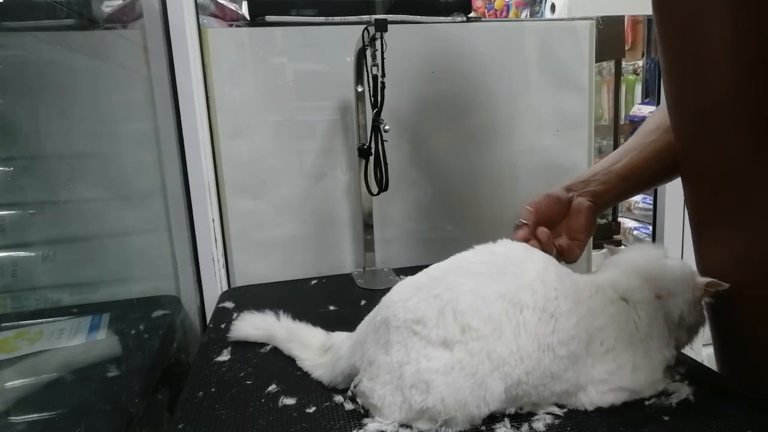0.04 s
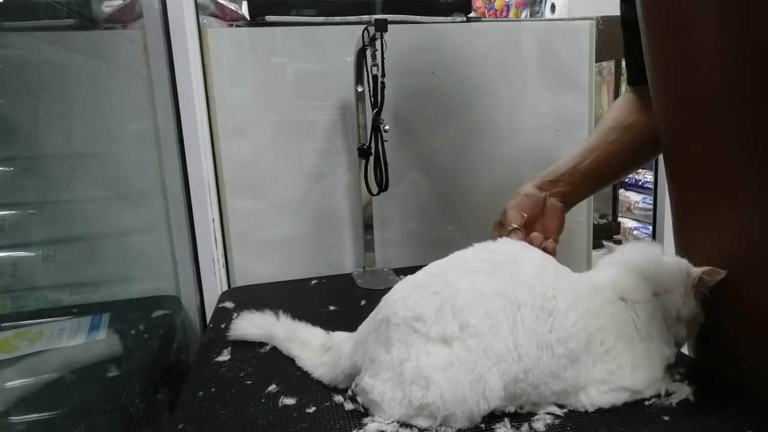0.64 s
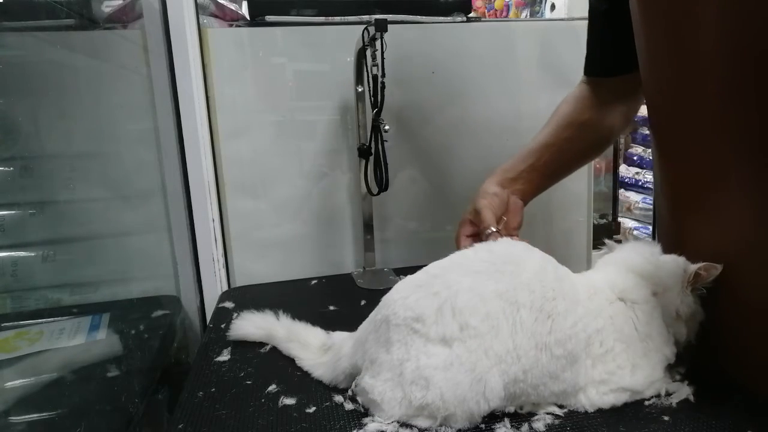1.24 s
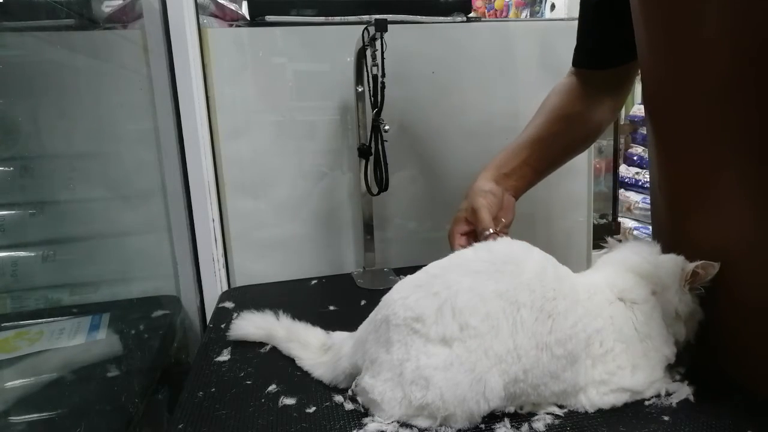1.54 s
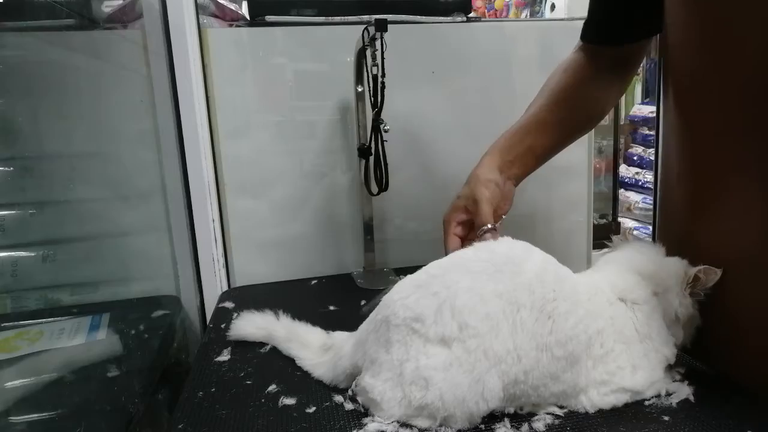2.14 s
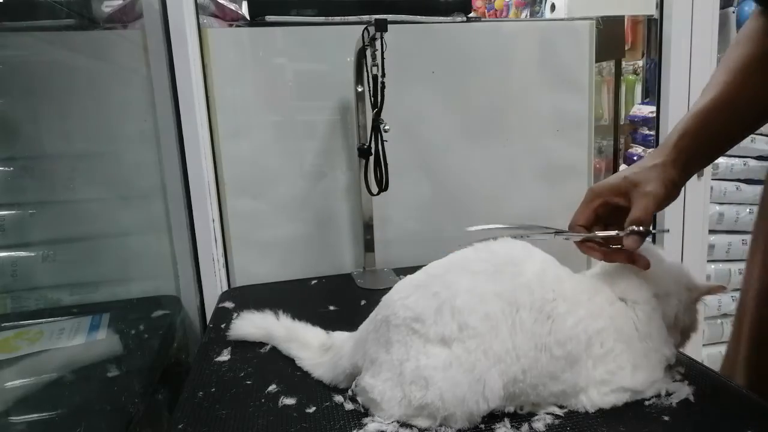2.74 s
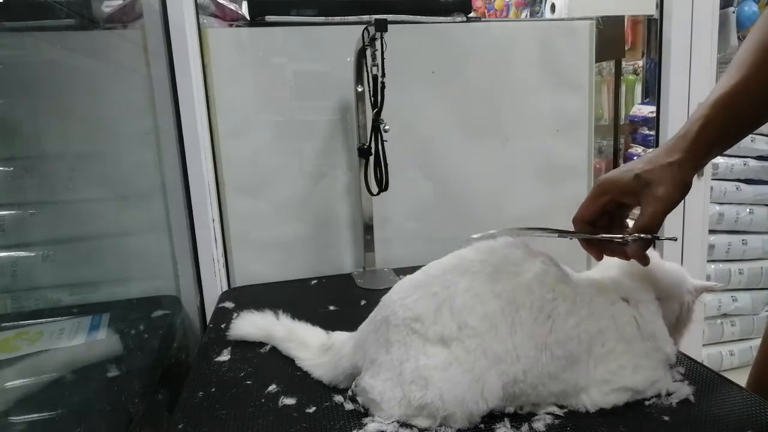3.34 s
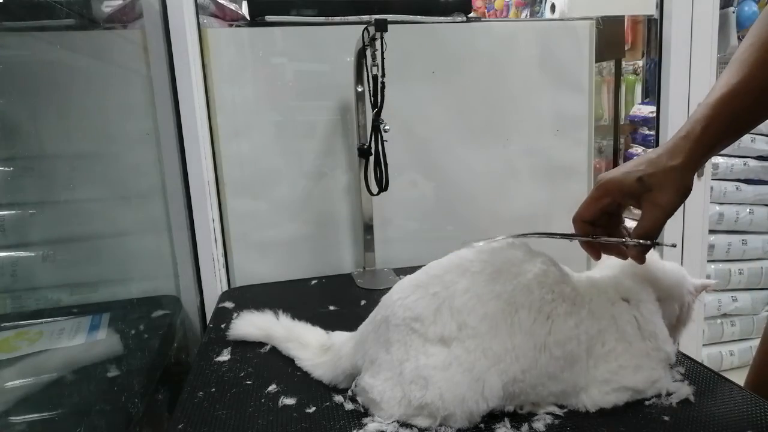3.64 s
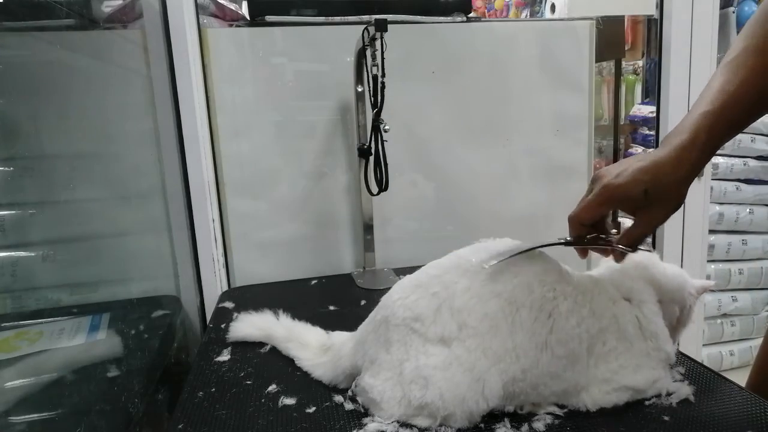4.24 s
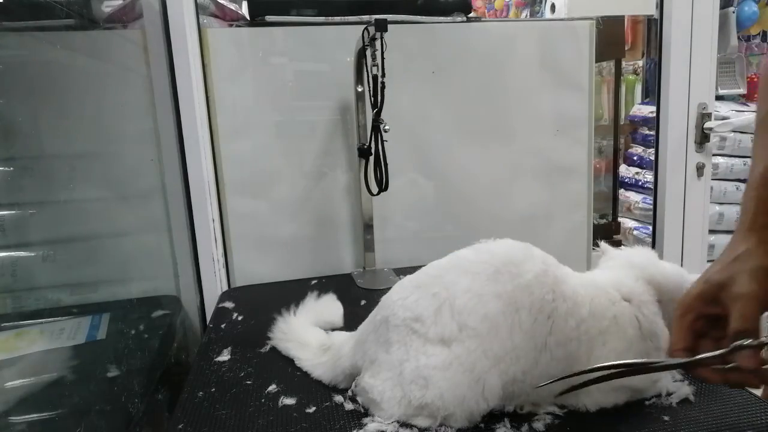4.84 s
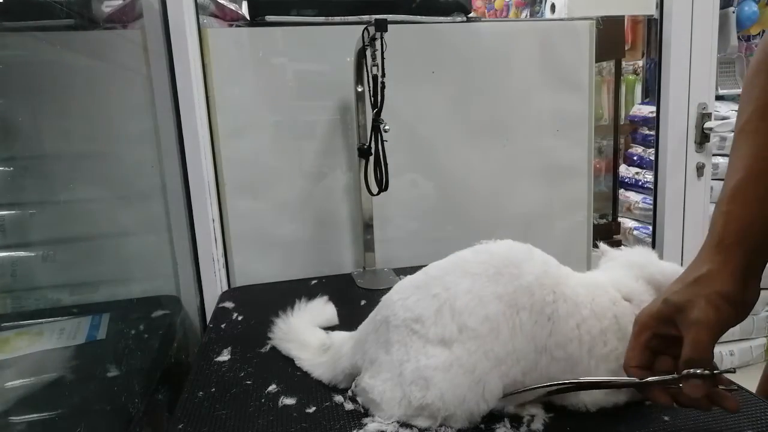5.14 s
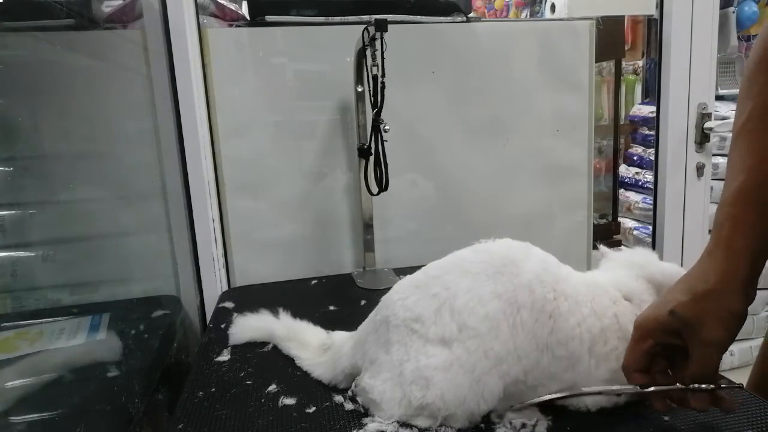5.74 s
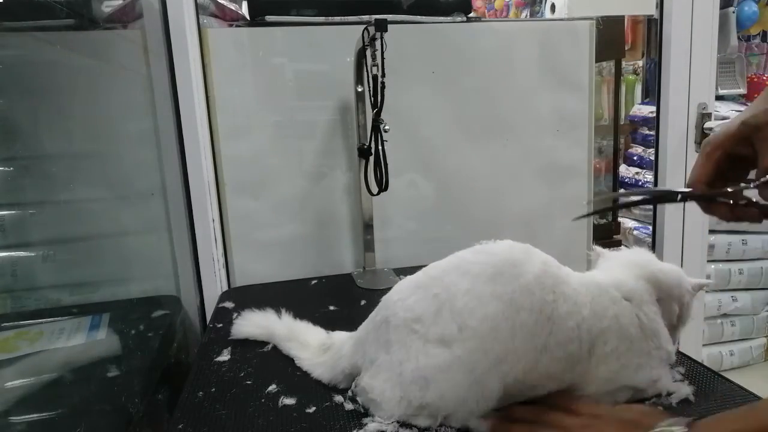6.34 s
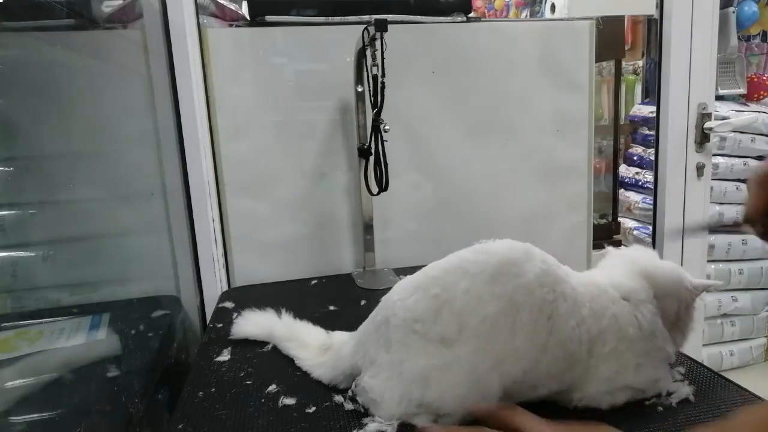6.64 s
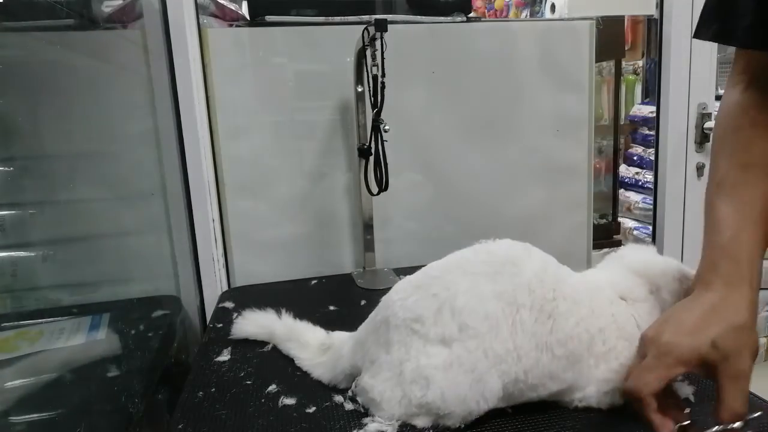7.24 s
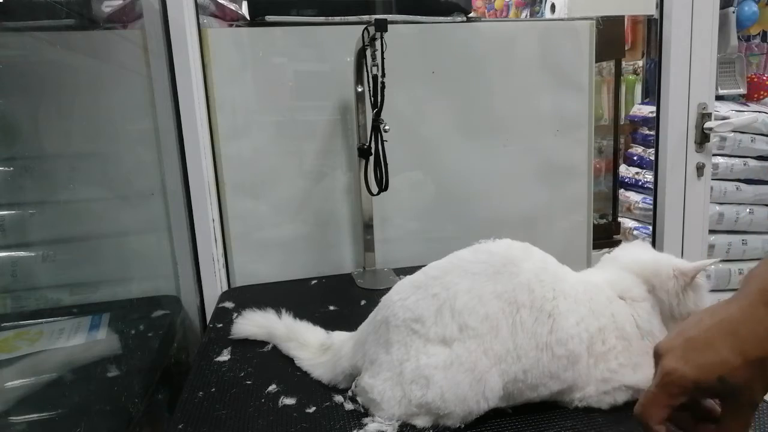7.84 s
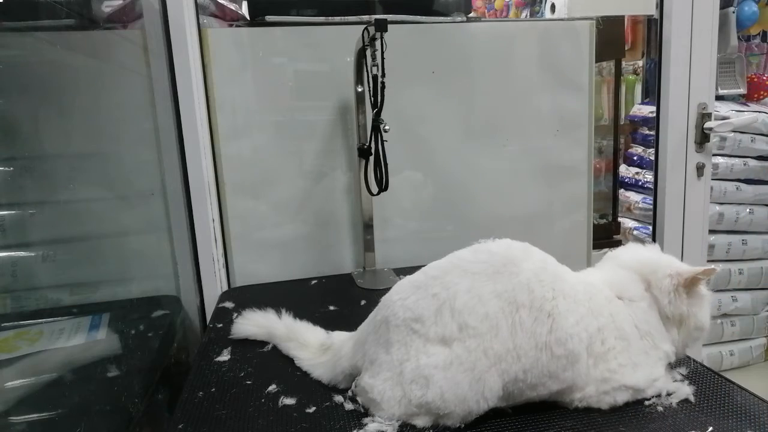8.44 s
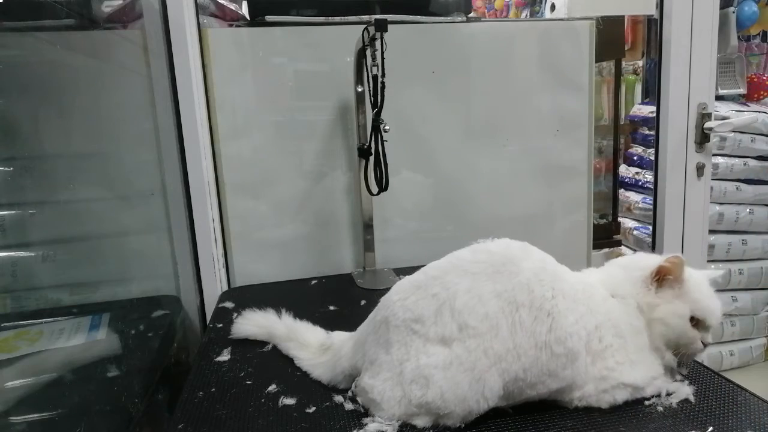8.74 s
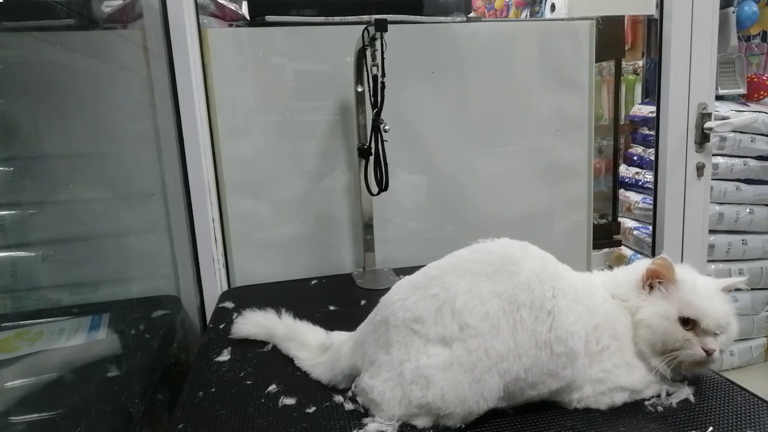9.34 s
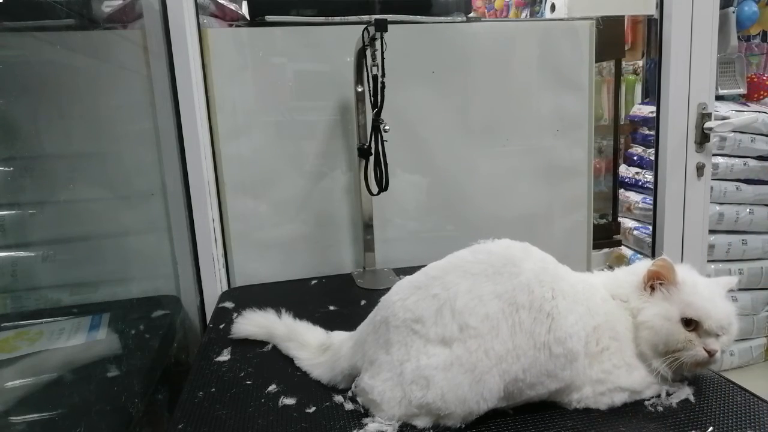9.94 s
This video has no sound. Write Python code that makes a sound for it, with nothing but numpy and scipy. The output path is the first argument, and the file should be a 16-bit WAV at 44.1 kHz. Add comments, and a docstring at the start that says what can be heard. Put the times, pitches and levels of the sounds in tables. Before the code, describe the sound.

In a small grooming shop with a low, steady ventilation hum, nearby scissors cut fur in a quick, even run of thin, bright metallic snips. Around halfway the cutting thins out to scattered snips and clicks. Handling noises take over a little further off: hands rubbing over a mat, small ticks, a low dragging rumble and several louder knocks that make the tabletop ring briefly.

```python
"""Scissors at a grooming table

Long curved scissors trim a cat's fur in a small, hard-walled shop. About three times a second the
edges grind open and shut, stick-slip friction exciting the blades' modes; at times they clack on
their stop. Then hands brush the mat, and things slid and knocked about set the table ringing.
Ventilation hums throughout."""
import sys
import numpy as np
from scipy import signal
from scipy.fft import rfft, irfft, next_fast_len
from scipy.io import wavfile
from scipy.ndimage import uniform_filter1d

SR = 44100
rng = np.random.default_rng(int(sys.argv[2]) if len(sys.argv) > 2 else 0)


def wav_record(signal):
    """Record a signal, one row per channel, as 16-bit PCM in the file named by sys.argv[1]."""
    frames = np.transpose(np.atleast_2d(signal))
    bounded = np.clip(frames, -1, 1)
    # unit amplitude maps onto the largest positive 16-bit level
    quanta = np.round(bounded * 32767).astype(np.int16)
    wavfile.write(sys.argv[1], SR, quanta)


N = 440559
T = np.arange(N) / SR
FFT_SIZE = next_fast_len(N + SR)
FREQ = np.maximum(np.fft.rfftfreq(FFT_SIZE, 1 / SR), 1)

# Scissor cuts: open_s, open_db, shut_s, shut_db, shut_length_s, rasp_db
SNIPS = [(.014, -47.5, .204, -41.5, 0.032, -2), (.362, -49.5, .524, -40, 0.024, -3),
         (0.668, -49, .817, -42.5, 0.021, -23), (.992, -52, 1.126, -39, 0.012, -2),
         (1.283, -47, 1.415, -39, 0.023, 6), (1.549, -51.5, 1.699, -60, 0.024, -4),
         (1.833, -54.5, 1.99, -39.5, 0.017, -2), (2.127, -49.5, 2.265, -42, .022, -15),
         (2.335, -45, 2.493, -42, 0.027, -11), (2.986, -48.5, 3.12, -36, 0.013, -5),
         (3.28, -47.5, 3.415, -40.5, 0.026, -1), (3.597, -49, 3.729, -36.5, 0.012, 3),
         (3.876, -48.5, 4.017, -40, 0.021, -1), (4.157, -47, 4.309, -39.5, 0.019, -1),
         (4.408, -46.5, 4.566, -41.5, .018, -4), (5.425, -61, 5.514, -49.5, 0.026, -5),
         (5.632, -64, 5.81, -36, 0.0134, -1), (5.896, -48.5, 6.107, -41.5, .028, -6),
         (7.52, -50.5, 7.835, -41.5, 0.021, -13)]
# Modes of the blades: pitch_hz, width_hz, rubbed_db, struck_db
BLADE_MODES = [(4780, 500, -10, -45), (5170, 150, -12, -16), (6350, 410, -11.5, -14.5),
               (7150, 107, 3.5, -18.5), (7730, 62, 3, -9.5), (8210, 64, 2.5, -6), (9090, 57, 1, -38),
               (9620, 79, -5.5, -32), (9390, 50, -21, -4.5), (10090, 45, 4.5, 1), (11230, 130, -6, -10.5),
               (13300, 390, -30, -23), (14000, 260, -13, -13), (14600, 360, -2.5, -15)]
# Steel striking steel: start_s, level_db
CLACKS = [(.072, -35.5), (0.712, -41.5), (.995, -48.5), (1.88, -34.5), (3.13, -50), (3.279, -44.5),
          (3.596, -43), (4.432, -44.5), (5.639, -35.5), (7.4108, -30.5), (7.418, -38), (7.8046, -31)]
# Things knocked on the table: start_s, body_db, body_hz, body_width_hz, crack_db, contact_s
KNOCKS = [(.233, -43.5, 675, 450, -51, 0.0087), (5.94, -45.5, 780, 694, -52.5, 0.065),
          (6.404, -69, 900, 700, -38, 0.027), (6.845, -48, 317, 350, -37, 0.0098),
          (7.31, -42.5, 600, 700, -58, .031), (7.355, -43.5, 760, 700, -57, 0.02),
          (7.799, -49.5, 593, 700, -42.5, 0.0094), (8.013, -35, 666, 228, -36, 0.0051),
          (9.048, -32.5, 600, 680, -46, 0.014), (9.551, -32.5, 783, 263, -38, 0.024),
          (9.738, -30.5, 475, 170, -40.5, 0.0099), (9.747, -26.5, 980, 305, -41, .011),
          (9.789, -36, 227, 179, -47, 0.02)]
# Modes of the table top: pitch_hz, width_hz, level_db
TABLE_MODES = [(225, 10, -20), (390, 22, -5.5), (444, 18, -2.5), (478, 23, -6), (640, 53, -6),
               (705, 13, -19), (780, 30, -6), (820, 4.8, -5), (860, 6.8, -8), (1024, 15, -10),
               (1093, 16, -17), (1220, 6.7, -20), (1310, 12, -23), (1750, 150, -8), (2380, 32, -8),
               (3010, 190, -2.5)]
# Hands and things passing over the mat: start_s, length_s, scrape_db, hiss_db
RUBS = [(4.854, 0.42, -61.5, -67.5), (6.065, 0.5, -56, -52.5), (6.412, 0.33, -46, -46),
        (6.803, 0.16, -50, -52), (6.845, 0.58, -62, -61), (7.269, 0.056, -47.5, -46.5),
        (7.319, 0.063, -41, -38.5), (7.495, 0.13, -63, -53.5), (7.616, 0.4, -61, -56),
        (8.0, 0.37, -66.5, -66.5), (8.236, 0.29, -65, -54.5), (8.55, 0.068, -56.5, -46.5),
        (8.613, .13, -43.5, -46), (8.746, 0.41, -41, -43), (9.17, 0.086, -63, -43.5),
        (9.237, 0.24, -59.5, -47), (9.442, 0.15, -49.5, -44)]
# Pushes that shake the table: start_s, length_s, level_db
DRAGS = [(4.51, 0.98, -51.5), (6.798, 0.071, -43), (7.284, 0.072, -45), (8.619, 0.32, -39),
         (8.715, .54, -38), (9.069, .085, -32.5), (9.385, .24, -47.5)]
# Soft swishes: start_s, length_s, level_db, centre_hz, width_hz
SWISHES = [(0.497, 0.88, -67.5, 2800, 700), (1.03, 0.24, -48, 5560, 2100), (1.166, 0.23, -52.5, 2980, 840),
           (1.3, .32, -59.5, 2670, 760)]
# Dry ticks of handling: start_s, level_db
TICKS = [(6.775, -53), (6.8, -53.5), (6.848, -40), (8.429, -48), (8.644, -43), (9.39, -45.5), (9.894, -60)]
# Short creaks: start_s, level_db, centre_hz, width_hz, contact_s
CREAKS = [(0.508, -56, 2730, 220, 0.013), (9.894, -44.5, 2380, 430, 0.0056)]
# Spectral envelopes of the handling noises and of moving air: frequency_hz, level_db
SCRAPE_SPECTRUM = [(240, -7.5), (400, -11.5), (690, -1), (850, -3.5), (1050, -6), (1400, -7.5),
                   (3100, -6.5), (4200, -15), (6000, -54)]
HISS_SPECTRUM = [(2200, -36), (3300, -4.5), (3950, -8.5), (4800, -7), (5700, -2), (6300, -5), (7100, -2.5),
                 (7800, -8.5), (8600, -9), (10700, -16.5), (14700, -20), (16000, -21)]
DRAG_SPECTRUM = [(25, -30), (50, -3), (87, -14), (124, 10.5), (157, 2.5), (221, -4.5), (307, -4.5),
                 (487, -6.5), (700, -11.5), (1400, -18), (2200, -53)]
TICK_SPECTRUM = [(1500, -15), (3200, 5.5), (4000, 0), (5500, 2.5), (7000, 1.5), (10000, -10.5),
                 (15000, -15)]
AIR_SPECTRUM = [(20, -4), (35, -10), (55, -5), (114, -5), (165, -6), (240, -5.5), (300, -9), (427, -14),
                (640, -18.5), (1200, -26), (2100, -30.5), (2700, -26.5), (3900, -32.5), (5400, -30.5),
                (8000, -36), (16000, -44.5)]
# Room modes driven by the ventilation: pitch_hz, width_hz, level_db
HUM_MODES = [(100.3, 14, -0.5), (123.3, 8.4, 7), (188.3, 4.3, 4), (232.6, 29, 3)]
# Reverberation time: frequency_hz, t60_s
ROOM_T60 = [(150, 0.18), (700, 0.55), (3000, 0.39), (8000, 0.35), (15000, 0.26)]
# Likeness of diffuse sound at the two microphone ports: frequency_hz, correlation
COHERENCE = [(60, 0.83), (150, 1), (350, 0.75), (700, 0.23), (1400, 0), (16000, 0.038)]
# Level difference between the ports: frequency_hz, left_minus_right_db
PORT_BALANCE = [(60, 1), (350, 3.5), (700, -2.5), (1400, -1.5), (2500, -0.5), (4500, -2.5), (6500, -7.5),
                (8300, 10), (10000, 1.5), (12500, 0), (15000, -5)]


def snips(rows, edge_s=0.0013, detune=0.0165, scatter_db=4, cutoff_hz=4200,
          grit_db=-13.5, floor_db=-26, zing_db=-12, shut_rasp_db=-12):
    """Friction of edges and hair drives the blades' modes, which shift a little with every grip."""
    track, freq = np.zeros(N), np.maximum(np.fft.rfftfreq(8192, 1 / SR), 1)
    grind = friction(slips_per_s=7000, spread_db=-1.5, patch_db=4.5, patch_hz=500)
    grips = rng.standard_normal((2 * len(rows), len(BLADE_MODES), 2))
    pole = np.exp(-1 / (edge_s * SR))  # rounds the onset and end of the force
    radiation = (1 + (cutoff_hz / freq) ** 8) ** -0.5  # narrow blades radiate little bass
    for (start_s, pressure, opening, rasp_db), grip in zip(strokes(rows), grips):
        force = signal.lfilter([1 - pole], [1, -pole], np.pad(pressure, (0, 512)))
        slips = force * unit(grind[int(abs(start_s) * SR):][:len(force)])
        modes = [(hz * (1 + detune * shift), width, db + scatter_db * tilt)
                 for (hz, width, db, _), (shift, tilt) in zip(BLADE_MODES, grip)]
        # the flats drag together with a lower rasp, most of all while opening
        rasp = resonances([(5500, 1200, rasp_db + (0 if opening else shut_rasp_db))], freq)
        steel = (resonances(modes, freq) + undb(grit_db) + rasp) * radiation + undb(floor_db)
        add(track, start_s, irfft(rfft(slips, 8192) * unit(steel)))
        add(track, start_s, undb(zing_db) * zing(force, opening))
    return track


def strokes(rows, creep_s=0.05, grind_s=0.03, shut_fade_db=-8.5):
    """Contact pressure: opening creeps, then grinds; shutting bites and eases towards the tips."""
    creep_db = np.linspace(-23, -7, int(creep_s * SR))
    grind_db = np.linspace(0.75, -0.75, int(grind_s * SR))
    for open_s, open_db, shut_s, shut_db, length_s, rasp_db in rows:
        yield open_s - creep_s, undb(open_db + np.r_[creep_db, grind_db]), True, rasp_db
        yield shut_s, undb(shut_db + np.linspace(0, shut_fade_db, int(length_s * SR))), False, rasp_db


def zing(force, opening, shut_hz=8000, open_hz=9300, wobble_hz=420):
    """A thin friction tone follows the edges' crossing point: up on opening, down on closing."""
    sweep = (shut_hz, open_hz) if opening else ((shut_hz + open_hz) / 2, shut_hz)
    wobble = unit(uniform_filter1d(rng.standard_normal(4096), 40))[:len(force)]
    pitch_hz = np.linspace(*sweep, len(force)) + wobble_hz * wobble
    amplitude = np.sqrt(2 * force * force.mean())  # sings even under light pressure
    return amplitude * np.sin(2 * np.pi * np.cumsum(pitch_hz) / SR)


def clacks(rows, crack_db=-21, cutoff_hz=3500):
    """Impact on the stop or on something hard excites the blades' modes and a broadband crack."""
    steel = resonances([(hz, width, db) for hz, width, _, db in BLADE_MODES]) + undb(crack_db)
    return colour(impacts(rows, contact_s=0.0067), steel / (1 + (cutoff_hz / FREQ) ** 2))


def blade_ring(start_s=7.807, pitch_hz=10080, level_db=-44, t60_s=0.31):
    """Free vibration: released by the hand, a blade rings on with exponential decay."""
    t = np.maximum(T - start_s, 0)
    return undb(level_db - 60 * t / t60_s) * np.sin(2 * np.pi * pitch_hz * t)


def knocks(rows, crack_hz=1670, crack_width_hz=1570, crack_share=0.67):
    """Impact excitation: the struck thing's body note and a shorter crack set the table ringing."""
    track = np.zeros(N)
    for start_s, body_db, body_hz, width_hz, crack_db, contact_s in rows:
        body = blow(body_db, body_hz, width_hz, contact_s)
        crack = blow(crack_db, crack_hz, crack_width_hz, crack_share * contact_s)
        add(track, start_s, body + crack)
    return through(track, table_response())


def blow(level_db, centre_hz, width_hz, contact_s, pulse_db=10):
    """A pulse and its decaying chatter, band-limited by the resonance of the struck thing."""
    t = T[:8192]
    force = rng.standard_normal(len(t)) * np.exp(-t / contact_s) + undb(pulse_db) * (t < 4 / SR)
    edges_hz = np.hypot(centre_hz, width_hz / 2) + np.array([-width_hz, width_hz]) / 2
    band = signal.butter(2, edges_hz, "bandpass", fs=SR, output="sos")
    return undb(level_db) * unit(signal.sosfilt(band, force))


def table_response(thud_db=-3):
    """Modal response of the table top over a flat, non-resonant thud."""
    return resonances(TABLE_MODES) + undb(thud_db)


def rubbing(arch=0.7):
    """Sliding friction of skin and fur on the ribbed mat; overlapping strokes add in power."""
    power = sum(np.outer(undb(levels_db), glide(start_s, length_s, arch)) ** 2
                for start_s, length_s, *levels_db in RUBS)
    scrape_gain, hiss_gain = np.sqrt(power)
    coarse = friction(slips_per_s=2500, spread_db=0.5, patch_db=3, patch_hz=90)
    fine = friction(slips_per_s=7700, spread_db=1, patch_db=3, patch_hz=120)
    scrape = colour(coarse, undb(over_hz(SCRAPE_SPECTRUM)))
    hiss = colour(fine, undb(over_hz(HISS_SPECTRUM)))
    return scrape_gain * scrape + hiss_gain * hiss


def dragging(arch=0.32, rumble_hz=240, width_hz=220, rumble_db=-7, shudder_db=1.5):
    """Forced vibration: a light push rumbles, a hard one also brings out the table's modes."""
    push = np.sqrt(sum((undb(db) * glide(start_s, length_s, arch)) ** 2
                       for start_s, length_s, db in DRAGS))
    slips = friction(slips_per_s=1500, spread_db=2, patch_db=1.5, patch_hz=60)
    rumble = undb(rumble_db) * colour(slips, resonances([(rumble_hz, width_hz, 0)]) ** 2)
    shudder = undb(shudder_db) * colour(slips, undb(over_hz(DRAG_SPECTRUM)) * table_response())
    return push * (rumble + np.sqrt(push / push.max()) * shudder)


def swishes(arch=0.43):
    """Light sliding friction, heard as overlapping swells of band-limited noise."""
    slips = friction(slips_per_s=8000, spread_db=3.5, patch_db=3.5, patch_hz=57)
    return sum(undb(db) * glide(start_s, length_s, arch) * colour(slips, resonances([(hz, width, 0)]) ** 2)
               for start_s, length_s, db, hz, width in SWISHES)


def ticks():
    """Brief contacts of small hard things give broadband clicks."""
    return colour(impacts(TICKS, contact_s=0.0021), undb(over_hz(TICK_SPECTRUM)))


def creaks():
    """Something shifts, sending a narrow-band burst through the table's modes."""
    track = np.zeros(N)
    for start_s, *burst in CREAKS:
        add(track, start_s, blow(*burst))
    return through(track, table_response())


def ventilation(air_db=-53.5, hum_db=-57, cutoff_hz=400):
    """Moving air makes broadband noise and drives a drone in the room's low modes."""
    air = colour(rng.standard_normal((2, N)), undb(over_hz(AIR_SPECTRUM)))
    air *= undb(air_db + 0.5 * wander(rate_hz=3.09))
    hum = colour(rng.standard_normal((2, N)), resonances(HUM_MODES) / (1 + (FREQ / cutoff_hz) ** 4))
    return diffuse(air + undb(hum_db) * hum)


def room_response(gap_s=0.0049, build_s=0.00074):
    """Reverberation of close, hard walls: each octave decays at its own rate, the midrange slowest."""
    t = T[:SR // 2]
    noise = rfft(rng.standard_normal((2, len(t))))
    octave = np.round(np.log2(np.maximum(np.fft.rfftfreq(len(t), 1 / SR), 125) / 125))
    tail = sum(irfft(noise * (octave == k), len(t)) * undb(-60 * t / over_hz(ROOM_T60, 125 * 2 ** k))
               for k in np.unique(octave))
    tail *= 1 - np.exp(-np.maximum(t - gap_s, 0) / build_s)
    return rfft(diffuse(unit(tail) / np.sqrt(len(t))), FFT_SIZE)


def diffuse(pair):
    """A diffuse field is coherent at two nearby points in the bass, incoherent in the treble."""
    coherence = np.clip(over_hz(COHERENCE), -0.99, 0.99)
    mid = through(pair[0], np.sqrt(1 + coherence))
    side = through(pair[1], np.sqrt(1 - coherence))
    return np.array([mid + side, mid - side]) / np.sqrt(2)


def ports(pan_db, slant):
    """Level difference at the ports: a lean to the left, plus colour from oblique incidence."""
    difference_db = pan_db + slant * over_hz(PORT_BALANCE)
    return undb([difference_db / 2, -difference_db / 2])


def place(x, room, direct_db, room_db, lag_ms, pan_db, slant):
    """Superposition of reverberation and direct sound, which reaches the left port late."""
    delay = np.exp(-2j * np.pi * FREQ * lag_ms / 1000)
    direct = undb(direct_db) * np.array([delay, np.ones_like(delay)])
    return through(x, (direct + undb(room_db) * room) * ports(pan_db, slant))


def moving(source, rows, spots, **placing):
    """Reflections depend on position: events take turns among spots, each with its own response."""
    return sum(place(source(rows[k::spots]), room_response(), **placing) for k in range(spots))


def friction(slips_per_s, spread_db, patch_db, patch_hz):
    """Stick-slip friction: random impulses of uneven size that come in patches; rms 1."""
    slips = (rng.random(N) < slips_per_s / SR) * rng.choice([-1, 1], N)
    sizes = undb(spread_db * rng.standard_normal(N))
    return unit(slips * sizes * undb(patch_db * wander(patch_hz)))


def impacts(rows, contact_s):
    """Each impact is a chatter of contacts with exponential decay."""
    track, t = np.zeros(N), T[:1024]
    for start_s, level_db in rows:
        chatter = rng.standard_normal(len(t)) * np.exp(-t / contact_s)
        add(track, start_s, undb(level_db) * unit(chatter))
    return track


def glide(start_s, length_s, arch):
    """Sliding speed traces a half sine; amplitude follows speed to the power arch."""
    speed, gain = np.sin(np.linspace(0, np.pi, int(length_s * SR))), np.zeros(N)
    add(gain, start_s, abs(speed) ** arch)
    return gain


def wander(rate_hz):
    """Random modulation by interpolated noise; rms 1."""
    knots = rng.standard_normal(8192)
    return unit(np.interp(T * rate_hz, np.arange(len(knots)), knots))


def resonances(modes, freq=FREQ):
    """Modal superposition: the summed frequency responses of damped oscillators."""
    return sum(undb(db) / (1 + 1j * (freq ** 2 - hz ** 2) / (freq * width)) for hz, width, db in modes)


def through(x, response):
    """Linear filtering by multiplication of spectra."""
    return irfft(rfft(x, FFT_SIZE) * response, FFT_SIZE)[..., :N]


def colour(x, response):
    """Filtering that conserves the power of white input."""
    return through(x, unit(response))


def over_hz(points, hz=FREQ):
    """Interpolation on a log-frequency axis."""
    knots_hz, values = np.transpose(points)
    return np.interp(np.log(hz), np.log(knots_hz), values)


def add(track, start_s, sound):
    """Superposition of a sound on a track."""
    i = max(int(start_s * SR), 0)
    track[i:i + len(sound)] += sound[:N - i]


def undb(db):
    """Decibels to amplitude ratio."""
    return 10 ** (np.asarray(db) / 20)


def unit(x):
    """Normalisation to rms 1."""
    return x / np.sqrt(np.mean(abs(x) ** 2))


def scene():
    """Sources in one room add linearly: scissors close by, handling further off, ventilation behind."""
    room = room_response()
    mix = moving(snips, SNIPS, spots=5, direct_db=1.5, room_db=0.5, lag_ms=0.095, pan_db=1.5, slant=1.34)
    mix += moving(clacks, CLACKS, spots=2,
                  direct_db=-3.5, room_db=-6, lag_ms=0.019, pan_db=2.7, slant=0.61)
    mix += moving(knocks, KNOCKS, spots=2,
                  direct_db=-10.5, room_db=-11.5, lag_ms=0.19, pan_db=3.5, slant=0.58)
    mix += place(creaks(), room, direct_db=-11, room_db=-8.5, lag_ms=0.33, pan_db=4, slant=0.6)
    mix += place(ticks(), room, direct_db=-0.5, room_db=3, lag_ms=0.026, pan_db=-1, slant=0.77)
    handling = rubbing() + dragging() + swishes() + blade_ring()
    mix += place(handling, room, direct_db=-3, room_db=-1.5, lag_ms=0.032, pan_db=0.3, slant=0.75)
    return mix + through(ventilation(), ports(pan_db=1.2, slant=0.72))


def record(dry, notch_hz=3890, width_hz=1190, depth=0.51, top_hz=15550):
    """An antiresonance of the ports dips the low treble; a steep low-pass cuts the top."""
    notch = 1 - depth * resonances([(notch_hz, width_hz, 0)])
    low_pass = signal.ellip(8, 0.2, 70, top_hz, fs=SR, output="sos")
    return signal.sosfilt(low_pass, through(dry, notch))


dry = scene()
out = record(dry)
wav_record(out)
```